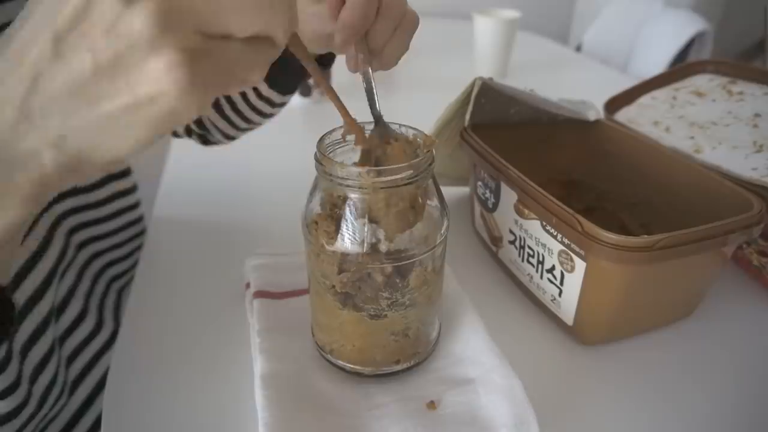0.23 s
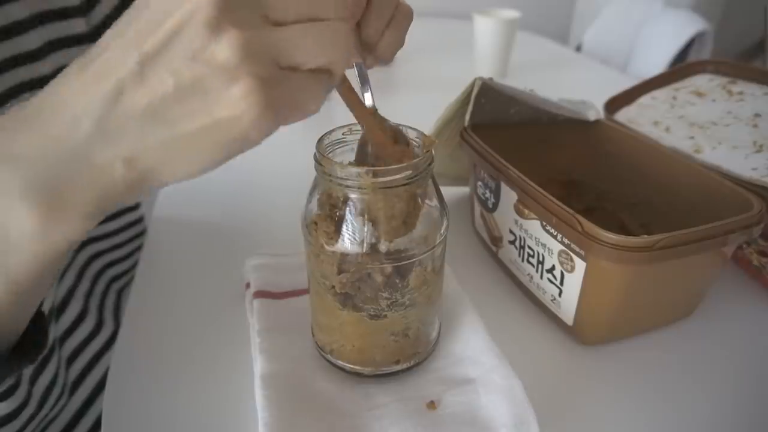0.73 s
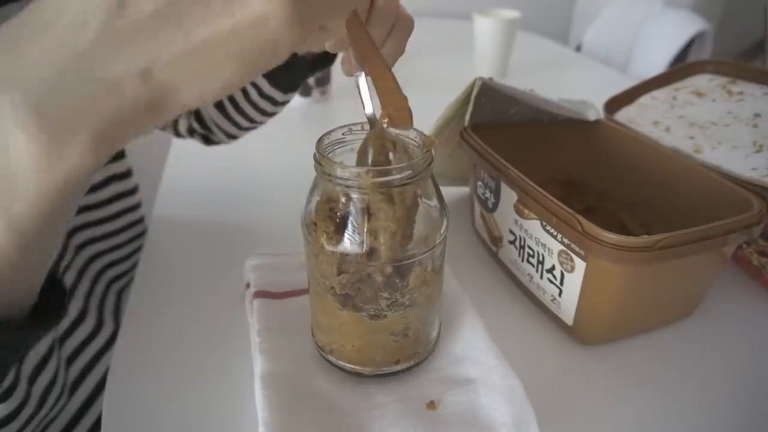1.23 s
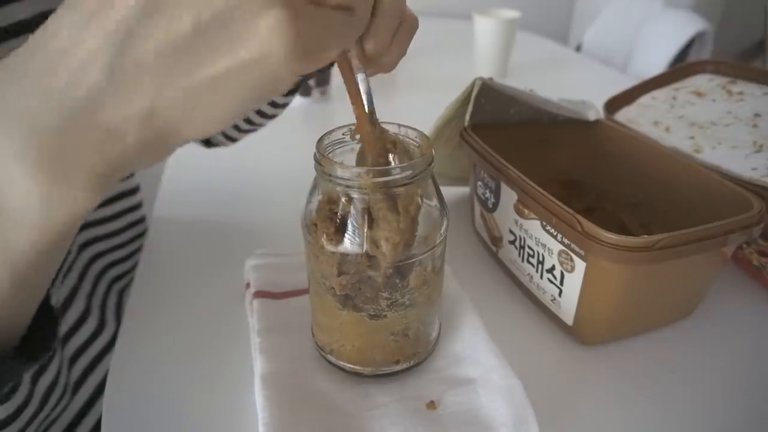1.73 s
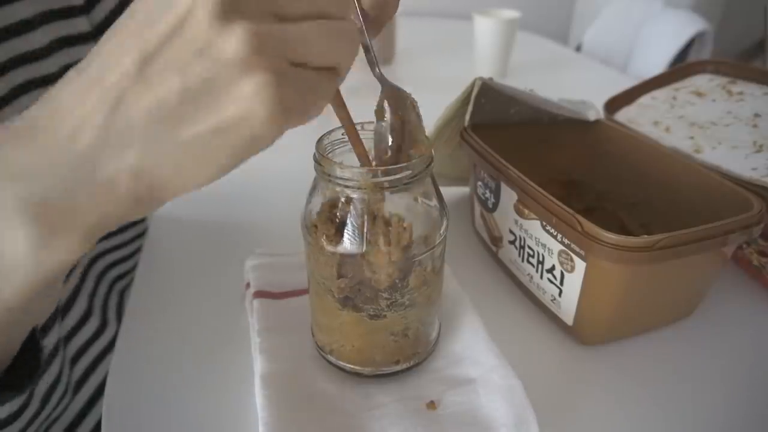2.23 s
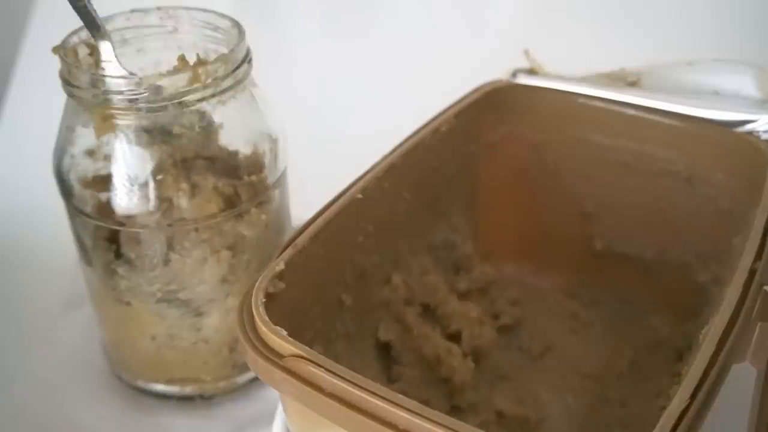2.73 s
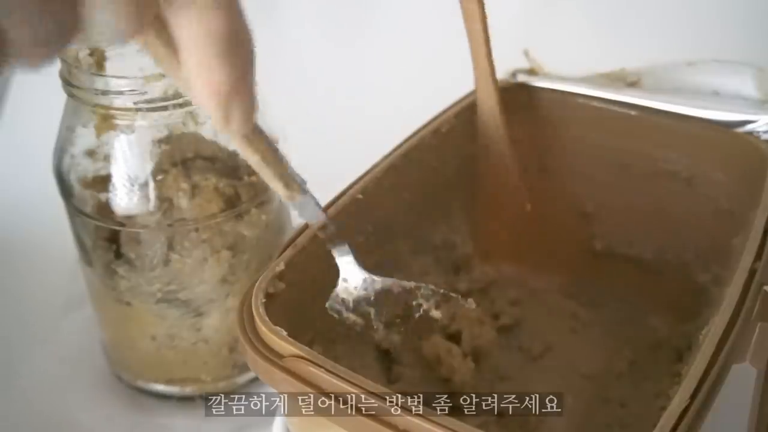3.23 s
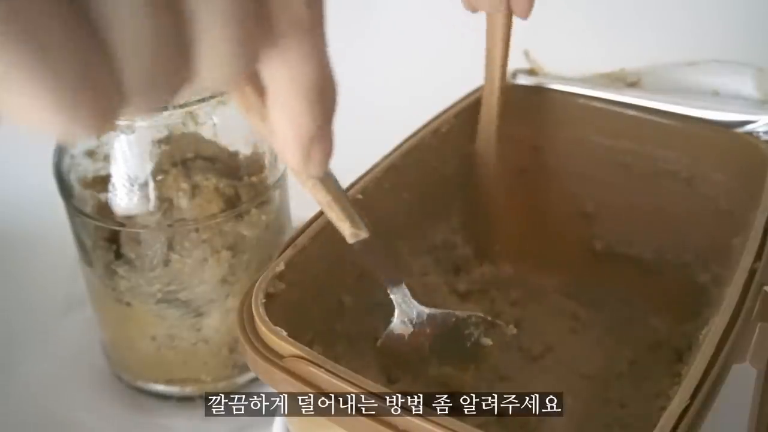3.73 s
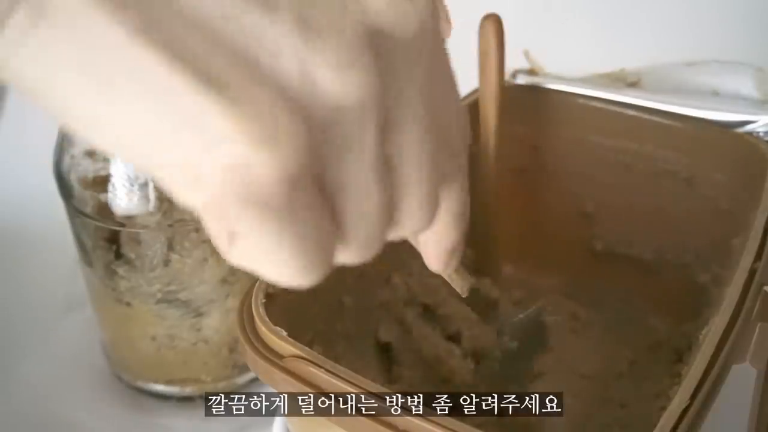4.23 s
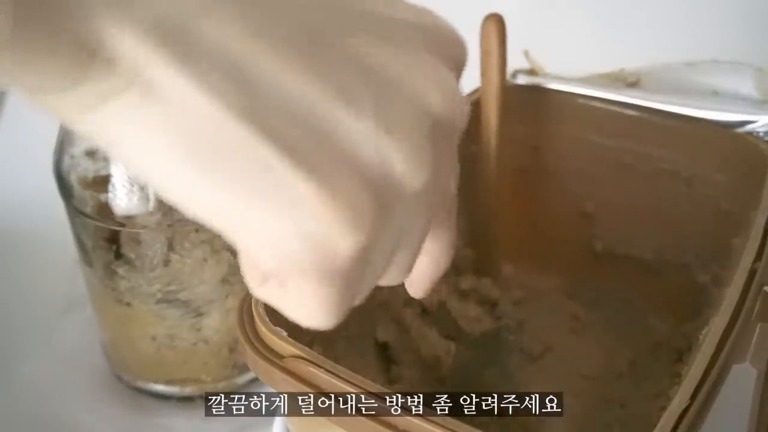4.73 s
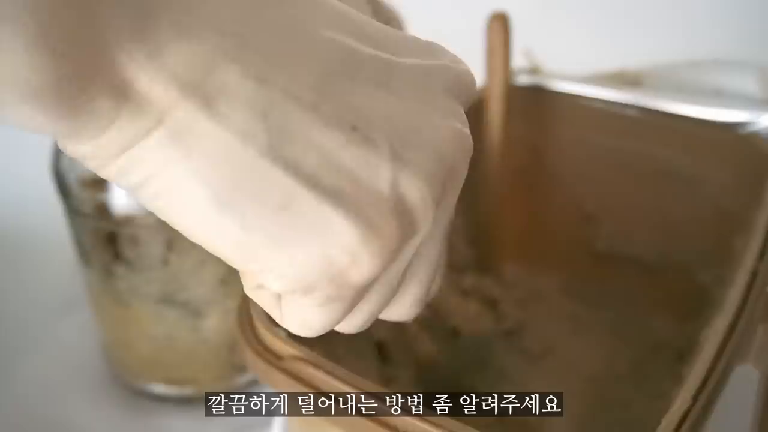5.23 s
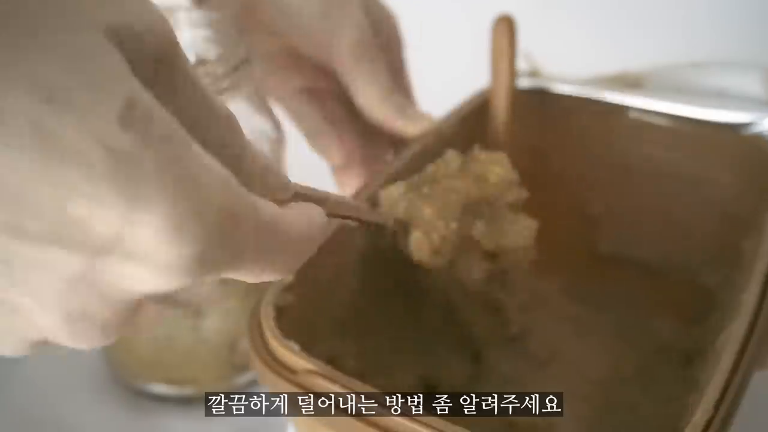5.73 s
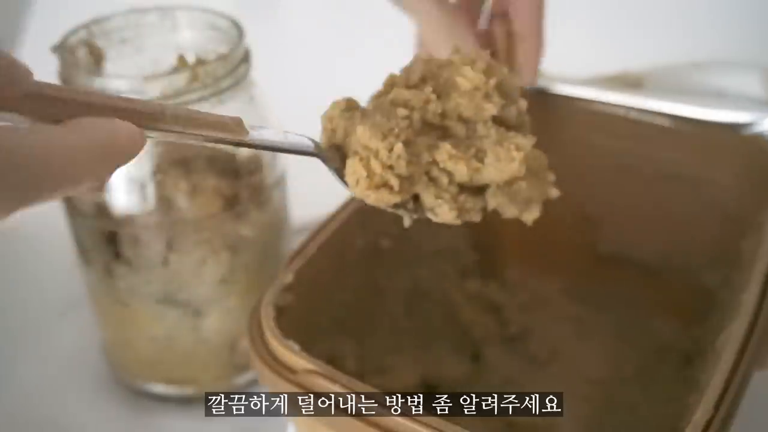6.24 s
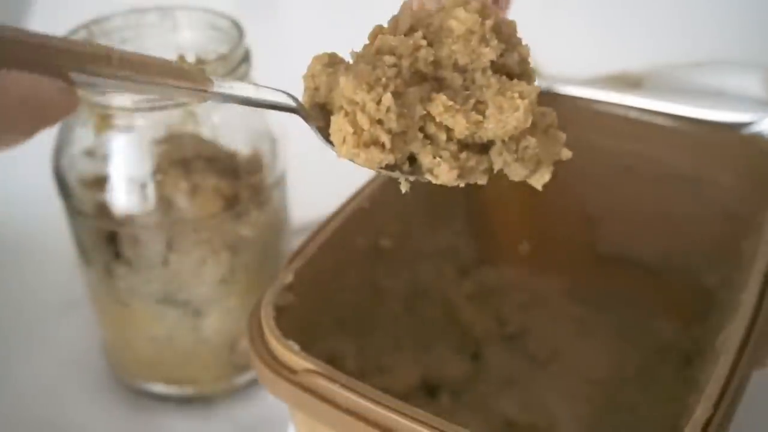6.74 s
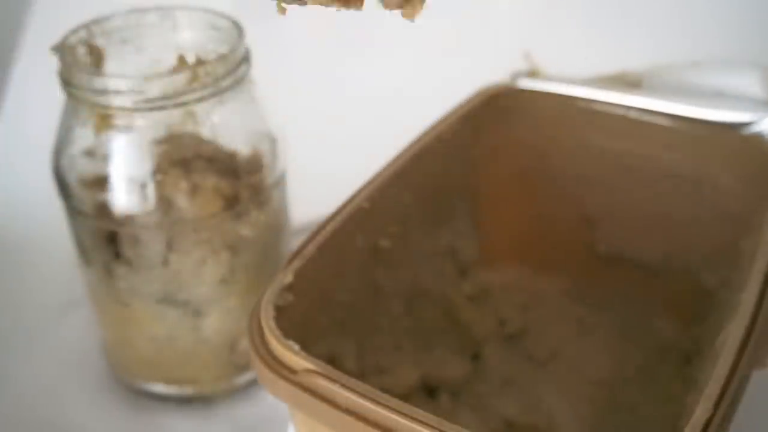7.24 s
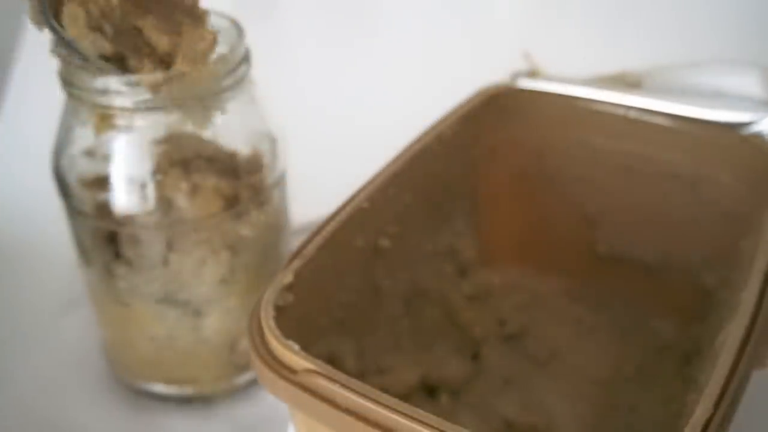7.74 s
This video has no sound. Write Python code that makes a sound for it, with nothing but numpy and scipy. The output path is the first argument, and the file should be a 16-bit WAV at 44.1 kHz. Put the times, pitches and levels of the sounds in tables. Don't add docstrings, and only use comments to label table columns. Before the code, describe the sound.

Close kitchen sounds of thick paste: tiny ticks, glass taps, dull tub knocks, creaking wood, one overloaded bang, squishy bubbles and final clinks.

```python
import sys
import numpy as np
from scipy import signal
from scipy.fft import rfft, irfft
from scipy.io import wavfile
from scipy.ndimage import uniform_filter1d

SR = 44100
rng = np.random.default_rng(int(sys.argv[2]) if len(sys.argv) > 2 else 0)


def decibels_to_gain(level_db):
    exponent = np.asarray(level_db, float) / 20
    return 10 ** exponent


def generate_wav(signal):
    frames = np.transpose(np.atleast_2d(signal))
    scaled = np.clip(frames, -1, 1) * 32767
    pcm = np.round(scaled).astype(np.int16)
    wavfile.write(sys.argv[1], SR, pcm)


N = 352359

# middle in seconds, half length in seconds, level in dB,
# body pitch in Hz, hiss in dB over the body.
SCOOPS = [(1.56, 0.028, -53, 794, -8), (1.508, 0.0078, -50, 1980, -27), (1.543, 0.004, -54, 2050, -27),
          (1.566, 0.013, -48.5, 2030, -27), (1.932, 0.019, -52, 547, -11), (2.159, 0.012, -40.5, 540, -1),
          (2.358, 0.013, -44.5, 495, -6), (2.602, 0.052, -53, 1190, -6), (3.219, 0.026, -45, 1090, -9),
          (3.225, 0.0088, -36.5, 2150, -22), (3.49, 0.0096, -33, 905, -17), (3.505, 0.028, -34.5, 297, -29),
          (4.568, 0.011, -35.5, 725, -9), (4.781, 0.025, -46.5, 810, -5), (4.864, 0.034, -40, 656, -14),
          (4.864, 0.017, -52, 1600, 6.5), (4.957, 0.031, -57.5, 3130, 3.5), (4.998, 0.003, -28, 940, -18),
          (5.051, 0.0077, -51, 2500, -4), (5.744, 0.008, -49, 1790, -3), (5.758, 0.01, -38, 660, -8),
          (5.822, 0.019, -34.5, 520, -10), (5.823, 0.0068, -40, 1190, -11.5), (5.824, .008, -42, 2700, -20),
          (5.755, 0.0065, -39, 2200, -17), (5.759, 0.038, -38, 200, -40), (2.578, 0.018, -52, 2780, -20),
          (2.765, 0.011, -67, 4800, -20), (2.881, .04, -62, 2400, -20), (3.226, .012, -46, 2550, -20)]
# start in seconds, length in seconds, crackle in dB.
STROKES = [(0, .1, -43), (.16, 0.076, -52), (.54, 0.17, -60), (.7, 0.23, -55.5), (1.04, 0.03, -54),
           (1.415, 0.0066, -49), (1.5, 0.042, -57), (1.8, 0.31, -57.5), (2.13, 0.051, -53),
           (2.2, 0.085, -64), (2.45, 0.13, -62), (2.755, 0.015, -51), (3.17, 0.043, -56), (3.4, 0.13, -56),
           (3.87, 0.024, -48), (3.93, 0.223, -57.5), (4.4, 0.045, -50.5), (4.56, 0.85, -59),
           (5.22, 0.19, -48.5), (5.42, 0.12, -44.5), (5.58, 0.16, -50), (5.72, 0.033, -53),
           (6.1, 0.62, -54), (6.56, 0.14, -39), (6.71, 0.078, -52)]
# frequency in Hz, level in dB per Hz.
CRACKLE_COLOUR = [(880, -49), (1500, -13), (2080, -11.5), (2720, -8.5), (3500, -9.5), (4500, -10),
                  (5440, -9.5), (6560, -14.5), (9010, -7.5), (16000, -22.5)]
# start in seconds, peak in dB.
TICKS = [(0.0159, -22), (0.0802, -29), (0.1678, -37), (0.19, -36), (0.25, -44), (.531, -45), (0.5417, -39),
         (0.5586, -50.5), (0.5746, -44), (0.5953, -35), (0.6196, -40), (.626, -43), (.636, -47),
         (.697, -43), (.714, -40), (.721, -45), (.733, -46), (0.7571, -36.5), (.79, -45), (.818, -40),
         (.841, -48), (0.8632, -41), (.885, -43), (0.9004, -39), (.908, -44), (.949, -49), (0.9685, -41),
         (0.9922, -39), (1.046, -35), (1.053, -33), (1.069, -39), (1.848, -52), (1.896, -58), (1.985, -47),
         (2.025, -48), (2.075, -42), (2.0978, -35), (2.112, -47), (2.7593, -36.5), (4.0826, -54),
         (4.445, -33.5), (5.225, -44), (5.262, -43), (5.286, -46), (5.312, -45), (5.349, -37),
         (5.357, -33.5), (5.369, -44), (5.4021, -28), (5.4271, -43), (5.458, -41), (5.471, -31.5),
         (5.5, -25), (5.523, -36), (5.532, -36), (5.55, -33), (5.5979, -24.5), (5.631, -36), (5.7054, -42),
         (5.727, -39)]
# start in seconds, peak in dB.
POPS = [(0.706, -38), (.72, -44), (.748, -47), (.758, -48), (.79, -51), (0.815, -43), (.821, -46),
        (.866, -47), (0.8836, -46), (.905, -48), (1.047, -41), (1.502, -48), (1.945, -55), (2.045, -47),
        (2.056, -46), (2.076, -48), (2.275, -60), (2.1505, -32), (2.3506, -46), (3.1857, -35),
        (3.8856, -63), (4.6695, -31), (4.653, -50), (4.716, -44), (4.7805, -40), (4.801, -48), (4.823, -44),
        (5.085, -46), (4.8594, -41), (5.243, -38), (5.2614, -36), (5.3572, -31), (5.471, -39),
        (5.5001, -35.5), (5.6309, -44)]
# start in seconds, peak in dB, pitch in Hz.
SQUELCHES = [(1.773, -38.5, 2800), (1.794, -36, 2740), (7.1105, -30, 2950), (7.1429, -21.5, 2930),
             (7.1923, -19, 2000), (7.274, -16, 2925), (7.3074, -32.5, 2160), (7.3403, -29, 2900),
             (7.3714, -28, 2860), (7.4414, -16.5, 3013), (7.4692, -20, 2980), (7.4984, -17.5, 2970),
             (7.5254, -18.5, 2960), (7.574, -29, 1760), (7.598, -26, 1730), (7.67, -19, 3060),
             (7.7915, -18, 2990)]
# start in seconds, peak in dB, pitch in Hz.
SLIPS = [(5.2437, -26.5, 2650), (5.2612, -40, 2830), (5.2846, -24, 2720), (5.3116, -28, 2500),
         (5.343, -30, 2760), (5.3495, -18, 2900), (5.3854, -27, 2870), (5.4029, -29, 2420),
         (5.4313, -50, 2210), (5.4318, -29, 2520), (5.4562, -26, 2490), (5.4992, -30, 2410)]
# start in seconds, peak in dB, pitch in Hz.
POCKETS = [(7.0138, -38, 1980), (7.022, -32.5, 1890), (7.0297, -30.5, 1850), (7.0365, -29, 1730),
           (7.0448, -31, 1680), (7.05, -42, 1600), (7.067, -33, 1490), (7.071, -33, 1360),
           (7.084, -39, 1250), (7.094, -33, 1180), (7.11, -40, 1150), (7.122, -50, 1090),
           (7.129, -32, 1150), (7.129, -41, 2100), (7.246, -39, 1500), (7.2465, -40, 800),
           (7.253, -32, 820), (7.259, -35, 720), (7.2585, -41, 1440), (7.2665, -31.5, 900),
           (7.273, -36, 850)]
# start in seconds, peak in dB, ring and ping in dB over the thud.
CLINKS = [(1.421, -27.5, -20, -2.5), (1.47, -36, -20, 5), (1.502, -35, -9, 0), (1.542, -38.5, -13, -3),
          (1.5592, -42, -18, 3), (1.563, -42, -18, 3), (1.915, -32.5, -16, 9), (1.956, -42, -15, 2),
          (2.148, -28, -22, -14), (2.233, -44, -12, -1), (2.3511, -22, -15, 6.5), (2.56, -31.5, -6, 1),
          (2.5681, -44, 0, 8), (2.5909, -42, -3, 13), (2.6103, -48, 2, 10), (2.674, -47, 2, 14),
          (7.827, -24, -26, -8), (7.833, -42.5, -10, 10), (7.8477, -38, -20, 0), (7.854, -33, -20, -3),
          (7.9028, -34, -16, 3), (7.9226, -45, -8, 9), (7.9341, -33, -6, 12)]
# start in seconds, end in seconds, level in dB.
DRAGS = [
    (0.165, 0.207, -68),
    (1.545, 1.584, -55),
    (1.6, 1.727, -66),
    (2.562, 2.7, -50),
    (2.631, 2.863, -60),
    (2.74, 2.79, -64),
    (7.844, 7.89, -54),
    (7.901, 7.948, -46),
]
# frequency in Hz, level in dB, t60 in seconds.
JAR_MODES = [(2410, -20, 0.26), (2630, -8, 0.21), (2615, 2.5, 0.31), (2730, 2.5, 0.12), (2630, 3.5, 0.38),
             (2873, -9, 0.227), (3120, -9, 0.156), (3620, -10.5, 0.079), (4780, -11, 0.06),
             (4950, -10, 0.06), (5150, -8, 0.09), (5570, -24.5, 0.065), (8100, -9, 0.098),
             (8000, -25, 0.113)]
# frequency in Hz, level in dB, t60 in seconds.
THUD_MODES = [(540, -4, 0.035), (825, -3, 0.022), (1220, 9.5, 0.0022), (1930, -1, 0.026),
              (2230, -2.5, 0.0064), (3350, 0.5, 0.0028), (5270, -11, .008), (5800, -11, 0.013),
              (9550, -5, 0.00185)]
# start in seconds, peak in dB, bowl pitch in Hz,
# wall boom and rim in dB over the bowl.
KNOCKS = [(3.186, -16, 1115, -8, -7), (3.198, -28, 473, -9, -5), (3.208, -40, 1110, -10, 4),
          (3.2217, -26.5, 1120, -4, -4), (3.2277, -31.5, 1130, -11, -3), (3.234, -32.5, 1150, -5, -6),
          (3.441, -25, 1150, 3.5, -15), (3.4415, -39, 700, -20, -31), (3.482, -25.5, 870, -0.5, -7),
          (3.4825, -23.5, 1130, -16, -24), (3.495, -38, 1050, -4, -8), (4.558, -27, 678, -9, -12),
          (4.667, -45, 603, 1, -16), (4.759, -36, 820, -12, -11), (4.996, -29, 890, -9, -6.5),
          (5.349, -39, 2514, -7, -12), (5.433, -41, 653, -15, -12), (5.75, -27, 574, -8, -12),
          (5.82, -30, 480, -5, -16)]
# frequency in Hz, level in dB, t60 in seconds.
TUB_MODES = [(131.3, -15, 0.37), (202, -9.5, 0.098), (266.5, -5.5, 0.21), (367, -7, 0.081),
             (522, -9.5, 0.054), (658, 0, 0.04), (850, -19, 0.02)]
# frequency in Hz, level in dB, t60 in seconds.
RIM_MODES = [(1460, -23, 0.0055), (1760, 1, 0.01), (2270, 1, 0.011), (2600, -1.5, 0.0096), (3680, -4, 0.01),
             (5400, -9.5, 0.0091), (8900, -13, 0.0049)]
# start in seconds, peak in dB.
CREAKS = [(6.5642, -52), (6.576, -22), (6.584, -18), (6.593, -40), (6.6, -43), (6.6103, -19), (6.6153, -27),
          (6.6235, -27), (6.631, -29), (6.636, -23), (6.6398, -14), (6.653, -15), (6.6672, -12.5),
          (6.675, -17), (6.6845, -30), (6.695, -23)]
# start in seconds, end in seconds, level in dB.
CREAK_RUB = (6.61, 6.71, -62)
# frequency in Hz, level in dB, t60 in seconds.
SPATULA_MODES = [(2990, -14, 0.0039), (4250, -4, 0.005), (4600, -7, 0.004), (7200, -12, 0.0032),
                 (10000, -7, 0.0055), (13500, -19.5, 0.00195)]
# start in seconds, peak in dB,
# pitch in Hz, t60 in seconds.
NOTES = [(1.469, -39, 2050, .02), (1.502, -36, 1980, .025), (1.541, -37, 2050, .02),
         (1.553, -41, 2060, .04), (1.565, -41, 1950, .03), (1.561, -52, 5150, .04), (2.149, -31, 545, .07),
         (2.151, -37, 2260, .04), (2.155, -38, 3000, .035), (2.156, -44, 4500, .03),
         (2.173, -48, 2200, .04), (2.174, -49, 2760, .05), (2.179, -50, 3560, .06), (2.229, -49, 2300, .04),
         (2.351, -34, 3350, .025), (2.865, -60, 2400, .1), (2.94, -61, 2300, .12), (3.186, -15, 1150, .03),
         (3.2215, -28, 2480, .018), (3.227, -31, 2550, .02), (3.234, -31, 2450, .018),
         (3.452, -32, 255, .15), (3.482, -26, 350, .07), (3.4815, -35, 1750, .04), (3.494, -31, 340, .08),
         (3.494, -37, 1150, .05), (4.78, -40, 2500, .015), (4.87, -33, 620, .07), (5.3565, -35, 2800, .015),
         (5.751, -31, 1300, .025), (5.725, -40, 1750, .04), (5.7488, -9, 660, .027),
         (5.756, -41, 2400, .03), (5.752, -42, 4500, .03), (5.77, -29, 700, .08), (5.818, -19, 520, .045),
         (5.821, -23, 1180, .04), (5.819, -31, 2750, .03), (6.758, -32, 2200, .05), (6.772, -23, 1400, .08),
         (6.794, -23, 850, .12), (6.798, -25, 1120, .08), (7.1205, -24, 1080, .04),
         (7.1915, -39, 3400, .02), (7.1915, -39, 4550, .02), (7.307, -43, 4550, .025)]
# frequency in Hz, level in dB per Hz.
BLOW_COLOUR = [(29, -42), (50, -11), (236, -16), (600, -13), (941, -13.5), (1140, -18), (1410, -17),
               (1630, -13), (2330, -34), (3420, -41), (4340, -47), (9090, -55), (15000, -74.5)]
# frequency in Hz, t60 in seconds.
BLOW_T60 = [(60, 0.31), (130, 0.22), (260, 0.29), (500, 0.1), (1000, 0.049), (2000, 0.017), (4000, 0.047),
            (10000, 0.053)]
# frequency in Hz, level in dB, t60 in seconds.
BLOW_MODES = [(121, -2, 0.36), (141.6, -9.5, 0.36), (193, 6, 0.24), (265.4, 9, 0.22), (328, -5.5, 0.24),
              (472, -20, 0.23), (500, 6, 0.16), (574, -12, 0.16), (645, 11, 0.08), (690, 7, 0.045),
              (845, -7, 0.1), (1107, -6.5, 0.11)]
# frequency in Hz, level in dB per Hz.
BLOW_ECHO = [(60, -17), (250, -1.5), (600, 2.5), (1200, -4), (2050, -11), (2600, -28), (8000, -41),
             (15000, -60)]
# frequency in Hz, t60 in seconds.
KITCHEN_T60 = [(100, 0.49), (300, 0.7), (1000, 0.68), (3000, 0.47), (8000, 0.45), (15000, 0.1)]
# time in seconds, level in dB.
LEAN = [(0, -37), (1.3, -35), (1.8, -40.5), (2.35, -29.5), (3.03, -26.5), (3.14, -38.5), (5.0, -39),
        (5.6, -24), (6.5, -31.5), (6.9, -23), (7.55, -51.5), (7.85, -12), (7.99, -33)]
# start in seconds, length in seconds, level in dB.
SHIVERS = [(0, 0.082, -42), (.28, 0.33, -41), (.72, 0.3, -44), (1.2, 0.091, -42), (2.15, 0.36, -37),
           (2.6, 0.36, -30.5), (5.55, 0.35, -39), (6.08, .15, -37), (6.75, 0.138, -22), (6.9, .2, -43),
           (7.46, 0.32, -35)]
# start in seconds, gain in dB.
GAIN = [
    (0, 6.5),
    (0.138, -3),
    (2.555, 0),
    (5.473, 10.5),
]
# change in dB, one for each gain step.
AIR_BASS_DB = [-19, -7, 0.5, 0]
# frequency in Hz, level in dB per Hz.
AIR_COLOUR = [(35, -23), (60, -7.5), (142, -18), (227, -18.5), (301, -23.5), (371, -24.5), (469, -28.5),
              (666, -28.5), (1040, -33.5), (2350, -41.5), (3420, -44.5), (6580, -48), (16000, -54.5)]


def rms_one(x):
    return x / np.sqrt(np.mean(x ** 2) + 1e-20)


def at_hz(points, hz):
    table_hz, values = np.transpose(points)
    return np.interp(np.log(hz), np.log(table_hz), values)


def coloured(x, spectrum):
    hz = np.fft.rfftfreq(N, 1 / SR) + 1
    low_cut = np.minimum(hz / spectrum[0][0], 1) ** 4
    return rms_one(irfft(rfft(x) * decibels_to_gain(at_hz(spectrum, hz)) * low_cut, N))


def band_noise(low_hz, high_hz):
    sos = signal.butter(2, [low_hz, high_hz], "band", fs=SR, output="sos")
    return rms_one(signal.sosfilt(sos, rng.standard_normal(N + SR))[SR:])


def dying_noise(spectrum, t60s, rise_s):
    t, out = np.arange(SR) / SR, np.zeros(SR)
    edges = 40 * 2 ** np.arange(0, 9.1, .5)
    for low, high in zip(edges, edges[1:]):
        sos = signal.butter(2, [low, high], "band", fs=SR, output="sos")
        band = signal.sosfilt(sos, rng.standard_normal(SR))
        hz = np.sqrt(low * high)
        out += band * decibels_to_gain(at_hz(spectrum, hz) - 60 * t / at_hz(t60s, hz))
    return out * np.minimum(t / rise_s, 1) / np.sqrt(np.mean(out[:900] ** 2))


def grains(length, share, uneven_db=6.7):
    size, level, pick = rng.standard_normal((3, max(length, SR // 3)))[:, :length]
    return rms_one(size * decibels_to_gain(uneven_db * level) * (np.abs(pick) < share * 1.25))


def ring(clicks, hz, t60):
    r = decibels_to_gain(-60 / (t60 * SR))
    w = 2 * np.pi * hz / SR
    return signal.lfilter([0, np.sin(w)], [1, -2 * r * np.cos(w), r * r], clicks + 1e-18)


def strike(out_len, modes, contact_s, spread_db):
    t = np.arange(out_len) / SR
    rattle = rng.standard_normal(out_len) * (rng.random(out_len) < .06) * np.exp(-(t / contact_s) ** 2)
    force = .4 * rattle / np.sqrt(np.sum(rattle ** 2) + .05)
    force[0] += np.exp(-contact_s / 0.0086)
    signs = (-1) ** np.arange(len(modes))
    strengths = decibels_to_gain(spread_db * rng.standard_normal(len(modes))) * signs
    return sum(g * decibels_to_gain(db) * ring(force, hz, t60) for g, (hz, db, t60) in zip(strengths, modes))


def efforts(rows, rest_db, swell_db, attack_s, release_s):
    t, out = np.arange(N) / SR, np.full(N, decibels_to_gain(rest_db))
    for s, length, db in rows:
        done = np.clip((t - s) / length, 0, 1)
        edges = np.minimum(t - s, 0) / attack_s - np.maximum(t - s - length, 0) / release_s
        out += decibels_to_gain(db - swell_db * (1.5 - done)) * np.exp(edges)
    return out


def add(out, s, sound):
    i = round(s * SR)
    out[i:i + len(sound)] += sound[:N - i]


def scoops():
    out = np.zeros(N)
    for s, half_s, db, hz, hiss_db in SCOOPS:
        t = np.arange(-2 * half_s, 3 * half_s, 1 / SR)
        rub = grains(len(t), 0.34)
        body = rms_one(ring(rub, hz, 4.5 / hz))
        hiss = rms_one(signal.lfilter([1, -1], [1, -1.78, .81], rub))
        swell = np.exp(-(t / half_s) ** 2)
        add(out, s - 2 * half_s, decibels_to_gain(db) * swell * (body + decibels_to_gain(hiss_db) * hiss))
    return out


def rustle():
    work = efforts(STROKES, rest_db=-69.5, swell_db=4, attack_s=0.02, release_s=0.012)
    clump_db = np.repeat(rng.standard_normal((2, N // 160 + 1)), 160, axis=1)[:, :N]
    clumps = decibels_to_gain(5 * np.clip(clump_db, -3, 1.6))
    threads = np.zeros(N)
    for kind, clump in zip(("low", "high"), clumps):
        sos = signal.butter(4, 5700, kind, fs=SR, output="sos")
        threads += signal.sosfilt(sos, clump * grains(N, .12, 3.5))
    return decibels_to_gain(-6.5) * work * coloured(threads, CRACKLE_COLOUR)


def snaps(rows, mean_hz):
    out = np.zeros(N)
    for s, db in rows:
        in_jar = mean_hz < 5000 and s < 2.7
        higher = 1.18 if in_jar else 1
        hz = mean_hz * higher * np.exp(0.071 * rng.standard_normal())
        modes = [(hz, -1.5, 22.0 / hz), (hz * 0.36, -10, 2.2 / hz), (hz * 0.77, -7, 9.9 / hz)]
        add(out, s, decibels_to_gain(db + 4.5) * strike(600, modes, .0025, spread_db=2))
    return out


def crackle():
    return rustle() + snaps(TICKS, mean_hz=9330) + snaps(POPS, mean_hz=4250)


def squelch():
    out = np.zeros(N)
    soft, softer = np.hanning(9), np.hanning(17) / 1.4
    for s, db, hz in SQUELCHES + SLIPS:
        modes = [(hz, -1.5, 22.0 / hz), (hz * 1.9, -19, 30.0 / hz)]
        bubble = strike(900, modes, .0003, spread_db=0.62)
        add(out, s, decibels_to_gain(db - 19) * np.convolve(bubble, soft))
    for s, db, hz in POCKETS:
        modes = [(hz, -3.5, 15.0 / hz), (hz * 0.7, -9, 8.5 / hz)]
        pulse = strike(1200, modes, 0.00032, spread_db=0)
        add(out, s, decibels_to_gain(db) * np.convolve(pulse, softer))
    return out


def jar():
    out, drag = np.zeros(N), np.zeros(N)
    for s, db, ring_db, ping_db in CLINKS:
        ping = (2720, ping_db, 0.029)
        add(out, s, decibels_to_gain(db - 7) * strike(4000, THUD_MODES + [ping], .003, spread_db=2))
        add(out, s, decibels_to_gain(db - 14 + ring_db) * strike(22000, JAR_MODES, .002, spread_db=1.5))
    for start, end, db in DRAGS:
        length = round((end - start) * SR)
        fade = np.linspace(1, 0, length) ** 1.1
        add(drag, start, decibels_to_gain(db - 22.0) * grains(length, .15, 4.8) * fade)
    return out + sum(decibels_to_gain(db) * ring(drag, hz, t60 * 0.21) for hz, db, t60 in JAR_MODES)


def tub():
    out = np.zeros(N)
    for s, db, hz, boom_db, rim_db in KNOCKS:
        bowl_modes = [(hz, 0, 24 / hz), (hz * 1.02, db - 14, .28)]
        add(out, s, decibels_to_gain(db) * strike(9000, bowl_modes, .0003, spread_db=0))
        add(out, s, decibels_to_gain(db + rim_db) * strike(3000, RIM_MODES, .004, spread_db=2))
        add(out, s, decibels_to_gain(db + boom_db) * strike(10000, TUB_MODES, .0026, spread_db=2))
    return out


def creaks():
    out = np.zeros(N)
    for s, db in CREAKS:
        add(out, s, decibels_to_gain(db - 4.0) * strike(900, SPATULA_MODES, 0.0016, spread_db=3))
    start, end, rub_db = CREAK_RUB
    rub = grains(round((end - start) * SR), 0.022)
    add(out, start, decibels_to_gain(rub_db) * sum(decibels_to_gain(db) * ring(rub, hz, t60) for hz, db, t60 in SPATULA_MODES))
    return out


def notes():
    out, t = np.zeros(N), np.arange(9000) / SR
    for s, db, hz, t60 in NOTES:
        build = 1 - np.exp(-t * hz / 1.5)
        add(out, s, decibels_to_gain(db - 60 * t / t60) * build * np.sin(2 * np.pi * hz * t))
    return out


def blow():
    blow_s = 6.7215
    out, t = np.zeros(N), np.arange(20000) / SR
    add(out, blow_s, decibels_to_gain(-6) * dying_noise(BLOW_COLOUR, BLOW_T60, 0.00043))
    for hz, db, t60 in BLOW_MODES:
        build = 1 - np.exp(-t * hz / 3.7 * (hz / 300) ** 0.64)
        mode = strike(20000, [(hz, db, t60)], .001, spread_db=0) * rng.choice([-1, 1])
        add(out, blow_s, decibels_to_gain(-6) * build * mode)
    add(out, blow_s, decibels_to_gain(-16.5) * dying_noise(BLOW_ECHO, KITCHEN_T60, 0.0087))
    return out


def kitchen(x):
    tail = dying_noise([(100, 4.5), (15000, -6.0)], KITCHEN_T60, rise_s=0.00063)
    return signal.fftconvolve(x, tail * 0.012)[:N]


def table():
    lean_s, lean_db = np.transpose(LEAN)
    sway_db = np.interp(np.arange(N) / SR, lean_s, lean_db)
    sway = rms_one(band_noise(8.02, 13.83) + 0.16 * band_noise(14.2, 33.6))
    shiver = efforts(SHIVERS, rest_db=-55, swell_db=2.5, attack_s=.05, release_s=0.07)
    return decibels_to_gain(sway_db + 2.0) * sway + decibels_to_gain(-7.0) * shiver * band_noise(51.5, 62.0)


def background():
    t = np.arange(N) / SR
    starts, gains_db = np.transpose(GAIN)
    step = np.searchsorted(starts, t, "right") - 1
    air = decibels_to_gain(-49) * coloured(rng.standard_normal(N), AIR_COLOUR)
    bass = signal.sosfiltfilt(signal.butter(2, 120, fs=SR, output="sos"), air)
    air = air + bass * (decibels_to_gain(np.array(AIR_BASS_DB)[step]) - 1)
    hum = decibels_to_gain(-42.5) * np.sin(2 * np.pi * 39.6 * t)
    whine_hz, width_hz = 654.7, 21.5
    whine = decibels_to_gain(-65) * band_noise(whine_hz - width_hz / 2, whine_hz + width_hz / 2)
    whine = whine * (t > 2.555)
    gain = uniform_filter1d(decibels_to_gain(gains_db[step]), size=200)
    return gain * (air + hum + whine)


def scene():
    paste = scoops() + crackle() + squelch()
    hard = jar() + tub() + creaks() + notes()
    room = decibels_to_gain(-15) * kitchen(hard + decibels_to_gain(4.5) * paste)
    return (paste + hard + blow() + room + table() + background())[None]


def low_pass(x):
    return signal.sosfilt(signal.butter(12, 17050, fs=SR, output="sos"), x)


def record(dry):
    clipped = np.clip(dry, -1, 1)
    return low_pass(clipped)


dry = scene()
out = record(dry)
generate_wav(out)
```